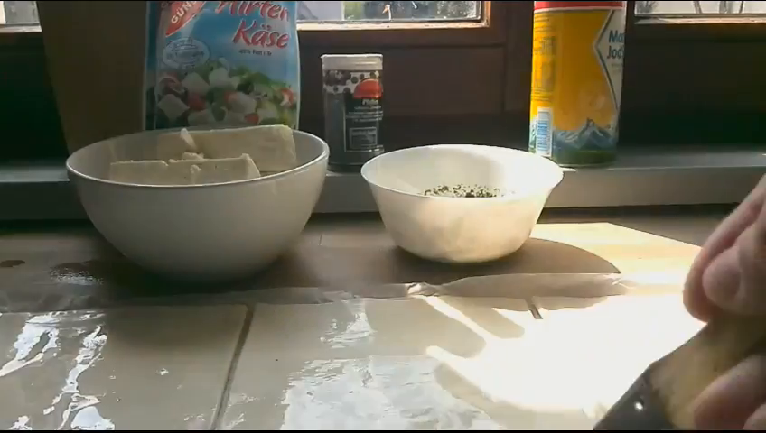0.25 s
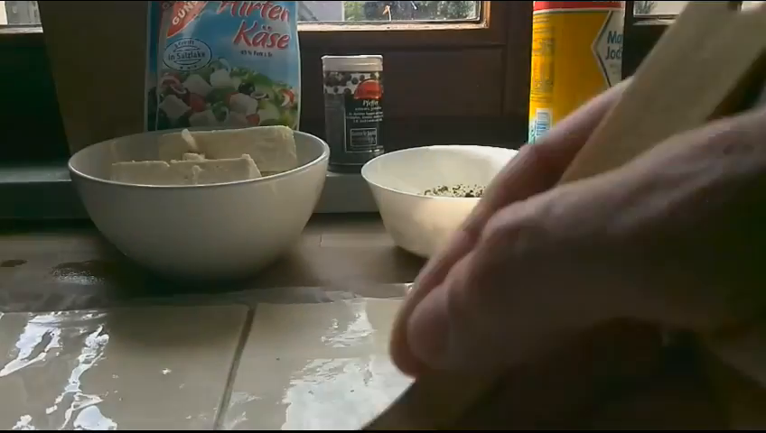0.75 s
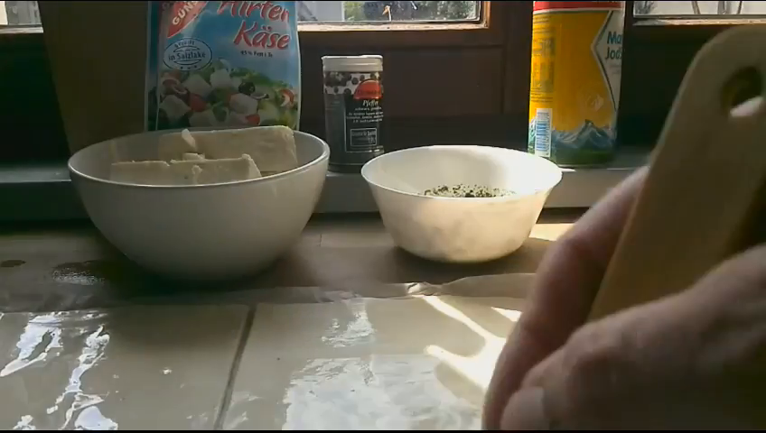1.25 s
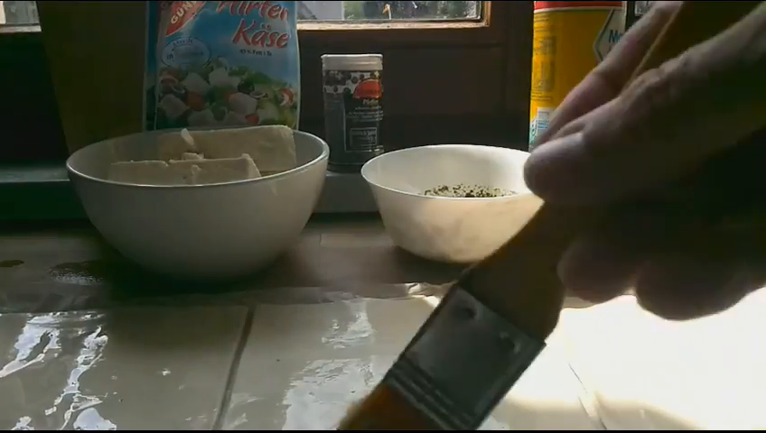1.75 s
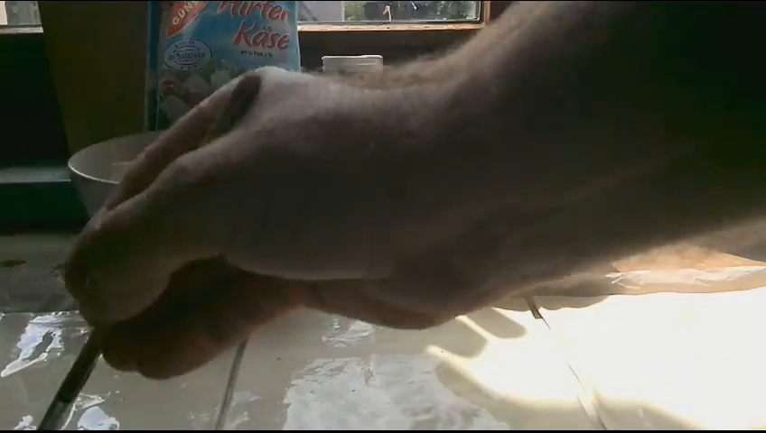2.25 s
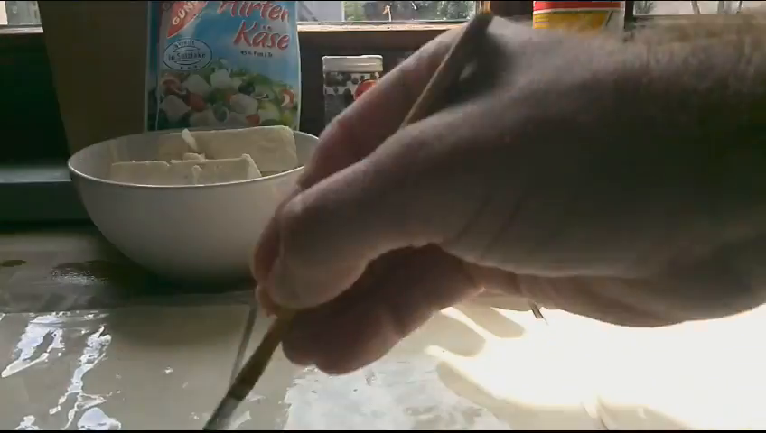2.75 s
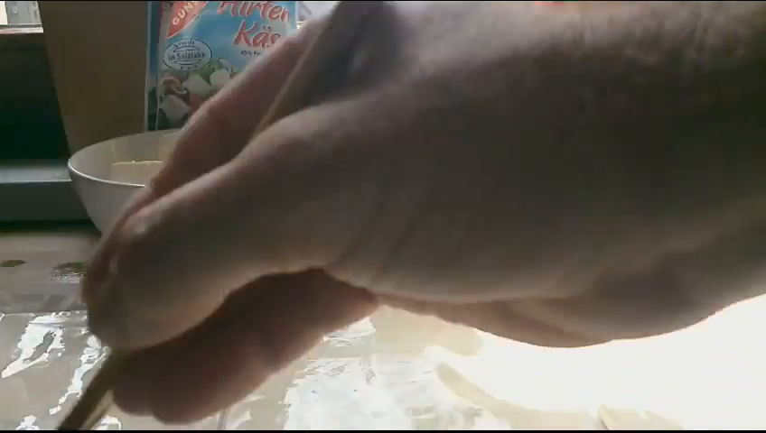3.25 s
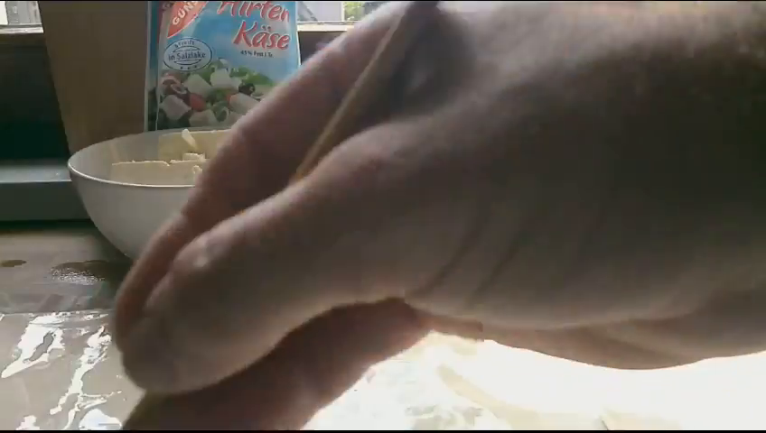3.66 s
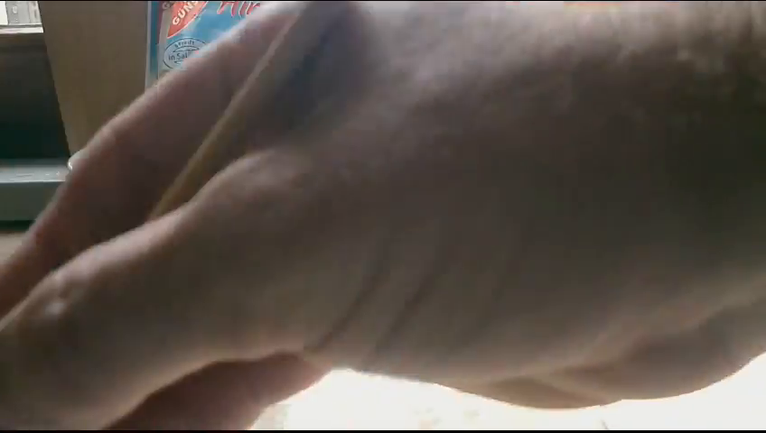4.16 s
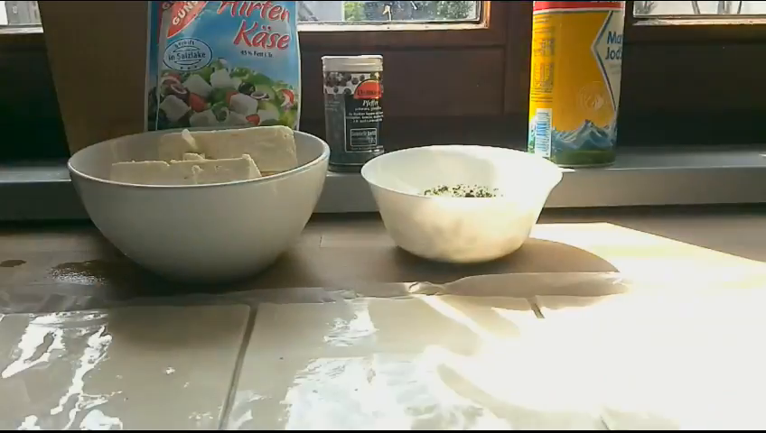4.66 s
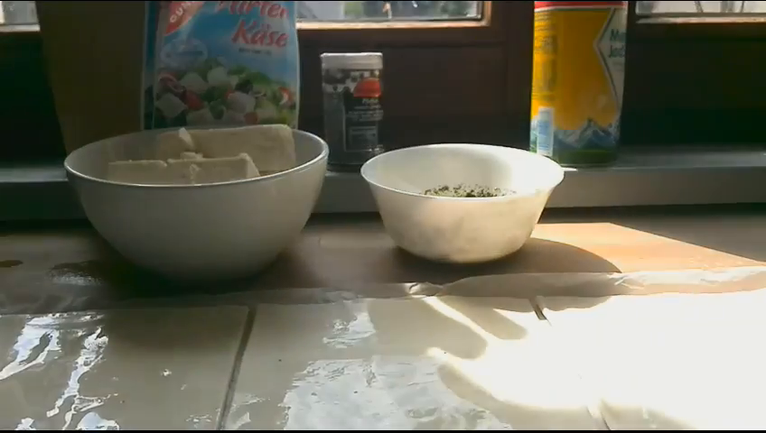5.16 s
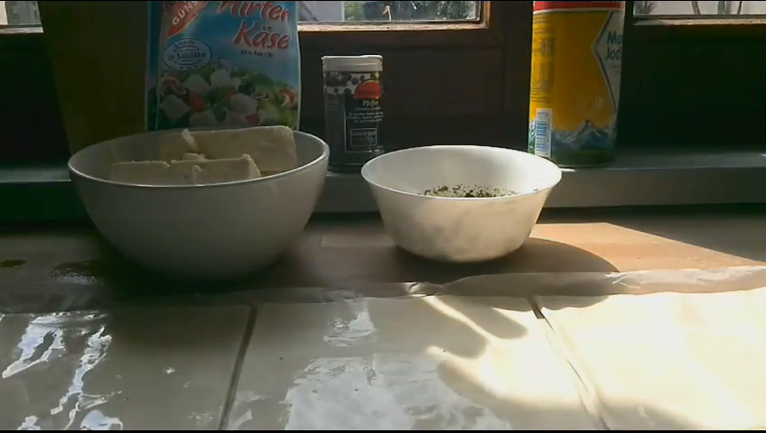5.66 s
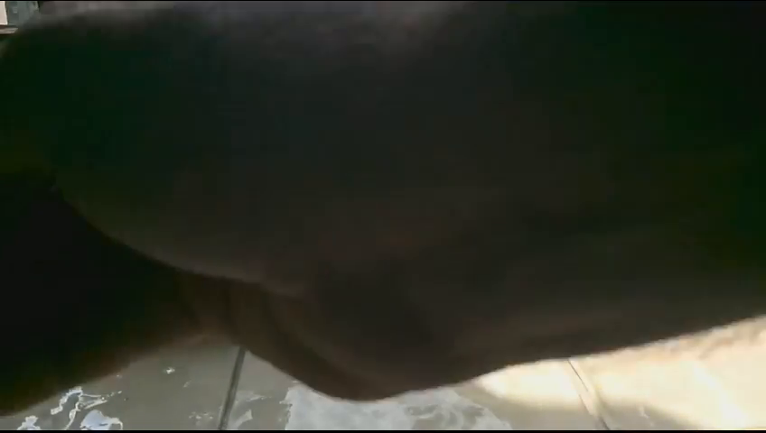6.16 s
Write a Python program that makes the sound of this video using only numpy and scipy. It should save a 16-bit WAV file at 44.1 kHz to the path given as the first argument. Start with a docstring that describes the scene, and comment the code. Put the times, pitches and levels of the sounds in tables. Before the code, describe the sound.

A small, quiet kitchen heard close to the counter: soft broadband hiss, slightly fuller at the start, and a low wavering mains hum that swells briefly around 0.4 s. A pastry brush makes short, whispery strokes on moist dough at about 0.3 and 0.7 s, then a distinctly stronger, brighter swish at 1.05 s. Lighter strokes follow irregularly at 1.7, 2.0, 2.4, 2.85, 3.3, 3.7 and 4.0 s, with tiny sticky ticks; the sharpest snaps at 3.68 s amid a little crackling cluster. A short dab comes at 4.6 s, and more ticks near 4.85 s. Extremely faint, high gliding whistles pass at 2.55-2.85 and 4.86-5.0 s. At 5.27 s the handle hits a glazed dish: one loud, hard, bright clack with a very brief ring and a short room echo. Faint dabs resume from 5.6 s, with small ticks until the end near 6.4 s.

```python
"""A kitchen counter, close to the microphone: a pastry brush sweeps quickly over moist dough sheets.
Friction makes the bristles slip and hiss (sparse random impulses shaped by pressure and spectrum);
the sticky surface ticks as it lets go (short bursts exciting a resonance), and once the handle taps a
glazed dish (decaying modes). Behind lie soft broadband noise, a wavering mains hum of narrow-band noise,
a thin high whistle of gliding sines heard twice, and the dense echoes of the kitchen."""
import sys
import numpy as np
from scipy import signal
from scipy.io import wavfile

SR = 44100
rng = np.random.default_rng(int(sys.argv[2]) if len(sys.argv) > 2 else 0)


def generate_wav(sig):
    """Save sig (samples, or channels by samples) to the path in sys.argv[1] as 16-bit PCM at SR."""
    pcm = np.round(np.clip(np.atleast_2d(sig).T, -1, 1) * 32767).astype(np.int16)
    wavfile.write(sys.argv[1], SR, pcm)


N = 282240

# Spectral density of the quiet kitchen, relative: [f/Hz, level per hertz/dB]
FLOOR_SPECTRUM = [(12, -34), (20, 6), (48, -2.5), (106, 2), (319, -1), (582, -5), (855, -6.5), (954, -5),
                  (1090, -9), (1440, -10), (3560, -15), (7450, -15), (10900, -17.5), (14000, -17)]
# Upper lines of the mains hum: [f/Hz, bandwidth/Hz, rms level/dB]
HUM_LINES = [(100.2, 3.2, -73), (206.3, 4.4, -79.5)]
# Side level by band, for strokes and floor: widest near 2 kHz, almost mono in the treble:
# [f/Hz, side level re mid/dB]
SIDE_LEVELS = [(60, -22), (150, -30.5), (380, -18), (940, -14), (2350, -8), (5870, -36), (14700, -51)]
# Pitch course of the high whistle, one list per glide: [t/s, f/Hz]
WHISTLE_GLIDES = [
    [(2.55, 13050), (2.635, 13800), (2.69, 13200), (2.744, 12300), (2.79, 12250), (2.84, 13300)],
    [(4.86, 10700), (4.895, 11050), (4.96, 10400), (5.02, 10400)],
]
# Typical level of each glide, about which it wavers: [level/dB]
GLIDE_LEVELS = [-75, -77]
# Modes of the glazed dish: [f/Hz, relative level/dB, t60/s]
DISH_MODES = [(1305, -13.5, 0.0081), (2260, -12, 0.02), (2465, -15, 0.038), (3620, -15, 0.016),
              (5010, -6.5, 0.012), (5010, 3, 0.019), (5720, -6, 0.0055), (7000, -33, .012),
              (7600, -14, .02), (8620, -4.5, 0.031), (8940, -6, 0.013), (10320, -24, 0.055),
              (12256, -31, 0.035), (13300, -20, .016)]
# Sticky releases of the dough: [t/s, peak level/dB, f/Hz, t60/s, height of broad snap re ring]
STICKY_TICKS = [(0.609, -40, 8450, 0.0046, 1.4), (0.798, -40.5, 8100, 0.007, 0.5),
                (1.174, -36, 8730, 0.0046, 0.8), (2.048, -44, 3480, 0.0032, 1.4),
                (2.465, -41, 3500, .005, 1.2), (2.752, -44, 2670, 0.0038, 0.8),
                (2.8392, -42, 8950, 0.0065, 0.5), (2.887, -37, 4040, 0.004, 1),
                (3.6402, -46, 2600, 0.004, 1.7), (3.6796, -25.5, 7400, 0.0041, 2.1),
                (3.7055, -34.5, 7100, 0.004, 0.5), (3.711, -47, 7950, 0.005, 0.7),
                (3.7356, -36, 8500, 0.005, 0.7), (3.7383, -39, 2400, .004, 1.1),
                (3.7423, -41.5, 1470, 0.0036, 1.2), (3.747, -41, 2400, 0.0029, 1.2),
                (3.7784, -46, 1900, 0.0026, 0.7), (3.8202, -49, 2080, 0.0042, 0.6),
                (4.012, -35.5, 7240, 0.0045, 0.8), (4.0385, -45, 8000, .005, .8),
                (4.0784, -40, 9370, 0.0045, 0.7), (4.181, -42, 2420, 0.0048, 0.5),
                (4.6684, -47, 9500, 0.005, 0.7), (4.8216, -41.5, 3400, 0.019, 0.27),
                (4.8327, -32.5, 11740, 0.0075, 0.28), (4.846, -32.5, 7000, 0.011, 0.31),
                (4.852, -43, 6730, 0.0085, 0.5), (4.8945, -44, 9000, 0.005, 0.7),
                (5.8003, -46, 8500, 0.0086, 0.7), (6.127, -39, 8200, 0.0042, 0.77),
                (6.3799, -35.5, 7800, 0.011, 0.4), (6.3954, -40.5, 5870, 0.024, 0.1)]
# Strokes and dabs: [t of full pressure/s, hold/s, rise/s, fall/s, hiss level/dB,
#                    level change over the hold/dB, drag level/dB, bright level re hiss/dB]
BRUSH_STROKES = [(.05, 0.054, 0.071, 0.17, -65, -2.5, -62, 1),
                 (.265, 0.053, .09, 0.1, -52.5, 2.5, -60.5, 3),
                 (0.684, 0.033, .11, .12, -52.5, 0.5, -60, 5),
                 (1.046, 0.057, 0.058, 0.073, -39.5, -0.5, -51, 6.5),
                 (1.44, .005, 0.11, 0.058, -61, -0.2, -68.5, 1.1),
                 (1.5, 0.078, .05, .08, -68.5, 2.5, -74, -3),
                 (1.665, 0.029, .07, 0.045, -56, 2.5, -64.5, 7),
                 (1.955, 0.089, 0.085, 0.085, -57.5, 5.5, -65.5, 1.1),
                 (2.405, 0.061, .12, 0.047, -52.5, 0.8, -60.5, 0.1),
                 (2.56, 0.1, 0.13, .1, -73.5, 1, -70.5, 6), (2.85, 0.044, 0.13, 0.097, -55.5, 6, -64, 6),
                 (3.04, 0.024, 0.023, 0.066, -65.5, -1.5, -61.5, -1.1),
                 (3.265, 0.048, 0.11, 0.12, -55, 2, -62, 6), (3.7, 0.04, 0.11, 0.11, -55.5, 1.5, -61.5, 5),
                 (4.04, 0.059, .08, 0.093, -51, -0.5, -56.5, 7),
                 (4.25, .005, 0.14, 0.13, -68.5, -0.5, -72, 1.1),
                 (4.5, .005, 0.037, 0.12, -68.5, -1, -69.5, -1),
                 (4.612, .004, 0.039, 0.036, -49, -0.2, -59.5, -4),
                 (4.86, 0.11, 0.052, .1, -67, 0.1, -68, 1.1),
                 (5.045, .01, 0.074, 0.11, -66.5, 0.5, -63.5, -3),
                 (5.155, .005, 0.08, 0.12, -63.5, -1, -67, -3),
                 (5.635, .005, .06, 0.059, -65.5, -3, -85, -2.1),
                 (5.795, .005, 0.039, 0.043, -58, -1.5, -69, -1.1),
                 (5.875, 0.0046, 0.067, 0.039, -59.5, -0.5, -66, 8),
                 (6.05, .05, .06, .1, -66.5, -1, -65, 1.1), (6.15, 0.036, 0.086, 0.075, -60, 1.8, -65.5, 6)]
# Spectral density of the bristle slips, relative: [f/Hz, level per hertz/dB]
BRISTLE_SPECTRUM = [(410, -49), (700, -12.5), (1730, -11), (2580, -6), (3150, -7), (4000, -7), (5200, -6.5),
                    (7580, 6), (9730, 2.5), (14000, -14)]

# Floor: it starts fuller and settles
FLOOR_DB, FLOOR_NARROWER_DB, OPENING_DB, OPENING_FADE_S = -62.5, -14.5, 3.5, 0.23
# Lowest hum line: it wanders and swells once
RUMBLE_HZ, RUMBLE_WIDTH_HZ, RUMBLE_DB, RUMBLE_WANDERS_DB = 49.4, 4.8, -71.5, 0.5
SWELL_S, SWELL_LENGTH_S, SWELL_DB = 0.42, 0.19, 9
# During the first glide a second line runs this far below
LOWER_LINE_HZ, LOWER_LINE_DB = 2980, -78
KITCHEN_T60_S, WALL_CUT_HZ, ECHO_DB, SIDEWAYS_DB = .36, 5500, -11, -30.5
TAP_S, TAP_DB, TAP_BASS_CUT_HZ = 5.2727, -14.5, 280
CRACK_DB, CRACK_T60_S = -15.5, 0.017
THUD_HZ, THUD_DB, THUD_T60_S = 554, -41, .008   # the counter under the dish
HIT_SKEW_DB = -20
EDGE_DB, EDGE_CURVE = 22, 1.5   # level lost over one rise or fall time; rounding of the shoulders
SLACK_DB_PER_S = 31             # bristles fold over mid-stroke: the longer the hold, the deeper the dip
DRAG_GROWS_DB, BRIGHT_FADES_DB = 1, 1   # dough loads the brush along a stroke
DULL_GROWS_DB = 3               # the hiss sinks in pitch as the brush slows
DRAG_BELOW_HZ, DULL_BELOW_HZ, BRIGHT_ABOVE_HZ = 5000, 7000, 10500
SLIPS_PER_S = 9000
CUTOFF_HZ = 13950


def from_db(db):
    """Logarithmic level: 20 dB is a factor of ten in amplitude."""
    return 10 ** (np.asarray(db) / 20)


def rms_one(x):
    """Normalisation of signal power: scale to rms 1."""
    return x / np.sqrt(np.mean(x ** 2) + 1e-20)


def at_hz(points, hz):
    """Interpolation of a spectrum on a logarithmic frequency axis."""
    table_hz, table_db = np.array(points).T
    return np.interp(np.log(hz), np.log(table_hz), table_db)


def drift(rate_hz):
    """Slow random fluctuation of rms 1: noise through a double one-pole low-pass."""
    step, warm_up = 40, 2000   # computed at every 40th sample, after the filter has settled
    r = np.exp(-2 * np.pi * rate_hz * step / SR)
    noise = rng.standard_normal(N // step + warm_up + 2)
    slow = signal.lfilter([1], [1, -2 * r, r * r], noise)[warm_up:]
    return np.interp(np.arange(N) / step, np.arange(len(slow)), rms_one(slow))


def ring(x, hz, t60):
    """Damped resonance: a unit click starts a decaying sine of height 1."""
    r = from_db(-60 / (t60 * SR))
    w = 2 * np.pi * hz / SR
    not_quite_silent = x + 1e-18   # keeps the arithmetic fast in silence
    return signal.lfilter([0, np.sin(w)], [1, -2 * r * np.cos(w), r * r], not_quite_silent)


def bands(sources, low_hz, steps, narrower_db=0):
    """Third-octave analysis, neighbours cut from different sources: (centre Hz, left and right)."""
    edges = low_hz * 2 ** (np.arange(steps + 1) / 3)
    for k, (low, high) in enumerate(zip(edges, edges[1:])):
        band_pass = signal.butter(2, [low, high], "band", fs=SR, output="sos")
        mid, side = signal.sosfilt(band_pass, sources[k % 2])
        hz = np.sqrt(low * high)
        side_gain = from_db(at_hz(SIDE_LEVELS, hz) + narrower_db)
        yield hz, mid + side_gain * side * [[1], [-1]]


def room_tone():
    """Stationary broadband noise, nearly equal on both sides, plus hum as noise in narrow resonances."""
    now = np.arange(N) / SR
    white = rng.standard_normal((2, 2, N))
    floor = 0
    for hz, band in bands(white, 22, steps=28, narrower_db=FLOOR_NARROWER_DB):
        floor = floor + from_db(at_hz(FLOOR_SPECTRUM, hz)) * band
    floor_db = FLOOR_DB + OPENING_DB * np.exp(-now / OPENING_FADE_S)

    swell = np.exp(-((now - SWELL_S) / SWELL_LENGTH_S) ** 2)
    rumble_db = RUMBLE_DB + SWELL_DB * swell + RUMBLE_WANDERS_DB * drift(1.3)
    hum = 0
    for hz, width_hz, db in [(RUMBLE_HZ, RUMBLE_WIDTH_HZ, rumble_db)] + HUM_LINES:
        t60 = np.log(1000) / (np.pi * width_hz)   # narrow lines ring long
        hum = hum + from_db(db) * rms_one(ring(rng.standard_normal(N), hz, t60))
    return from_db(floor_db) * rms_one(floor) + hum


def whistle():
    """Frequency modulation: slightly unsteady gliding sines, the integral of pitch giving the phase."""
    out, now = np.zeros(N), np.arange(N) / SR
    lower_line = np.subtract(WHISTLE_GLIDES[0], [0, LOWER_LINE_HZ])
    for glide, db in zip(WHISTLE_GLIDES + [lower_line], GLIDE_LEVELS + [LOWER_LINE_DB]):
        s, hz = np.transpose(glide)
        fade = np.clip(np.minimum(now - s[0], s[-1] - now) / .03, 0, 1)
        pitch = np.interp(now, s, hz) * (1 + .003 * drift(60))
        gain = np.sqrt(2) * from_db(db + 2.8 * drift(15))
        out += fade * gain * np.sin(2 * np.pi * np.cumsum(pitch) / SR)
    return out


def kitchen(x):
    """Reverberation: dense echoes build up in a few ms and decay, treble first; common and sideways tails."""
    s = np.arange(SR // 2) / SR
    noise = rng.standard_normal((2, len(s)))
    dull = signal.sosfilt(signal.butter(2, WALL_CUT_HZ, fs=SR, output="sos"), noise)
    treble = (noise - dull) * np.exp(-s / 0.068)
    build_up = np.minimum(s / 0.0036, 1)
    echoes = (dull + treble) * from_db(-60 * s / KITCHEN_T60_S) * build_up
    echoes = echoes / np.linalg.norm(echoes[0])
    mid, side = signal.fftconvolve(x[None], echoes, axes=1)[:, :N]
    return mid + from_db(SIDEWAYS_DB) * side * [[1], [-1]]


def tap():
    """Modal impact: the handle's knock cracks roughly and rings each dish mode, neighbours in opposite sense."""
    at, blow, rattle = round(TAP_S * SR), np.zeros(N), np.zeros(N)
    blow[at] = 1
    after_s = np.arange(N - at) / SR
    rattle[at:] = rng.standard_normal(N - at) * from_db(-60 * after_s / CRACK_T60_S)
    crack = signal.sosfilt(signal.butter(3, [3000, 9000], "band", fs=SR, output="sos"), rattle)
    modes = np.zeros(N)
    for k, (hz, db, t60) in enumerate(DISH_MODES):
        modes += (-1) ** k * from_db(db) * ring(blow, hz, t60)
    dish = from_db(TAP_DB) * modes + from_db(CRACK_DB) * crack
    bass_cut = signal.butter(1, TAP_BASS_CUT_HZ, "high", fs=SR, output="sos")
    thud = from_db(THUD_DB) * ring(blow, THUD_HZ, THUD_T60_S)
    return signal.sosfilt(bass_cut, dish) + thud


def ticks():
    """Adhesive release: a click of a few grains gives a broad snap and a short ring at its own pitch."""
    out, length = np.zeros(N), 2000
    grains = rng.standard_normal((len(STICKY_TICKS), 40)) * np.exp(-np.arange(40) / 7)
    snap_band = signal.butter(2, [1100, 15000], "band", fs=SR, output="sos")
    for (s, db, hz, t60, snap_share), burst in zip(STICKY_TICKS, grains):
        push = np.zeros(length)
        push[:40] = burst
        tone = ring(push, hz, t60)
        sound = tone / np.abs(tone).max() + snap_share * signal.sosfilt(snap_band, push)
        at = round(s * SR)
        out[at:at + length] += from_db(db) * sound[:N - at] / np.abs(sound).max()
    return out


def pressure():
    """Contact force sets level: strokes rise, hold with a dip and fall; gains of hiss, dull, drag, bright."""
    columns = np.array(BRUSH_STROKES).T[:, :, None]
    start, held, rise, fall, hiss_db, change_db, drag_db, bright_db = columns
    s = np.arange(0, N / SR + .002, .002)
    along = np.clip((s - start) / held, 0, 1)
    outside = np.maximum(start - s, 0) / rise + np.maximum(s - start - held, 0) / fall
    dip_db = SLACK_DB_PER_S * held * np.sin(np.pi * along) ** 2
    shape_db = change_db * along - dip_db - EDGE_DB * outside ** EDGE_CURVE
    # from -1 at the beginning of the rise to 1 at the end of the fall
    course = np.clip(2 * (s - start + rise) / (rise + held + fall) - 1, -1, 1)
    levels_db = [hiss_db,
                 hiss_db + DULL_GROWS_DB * course,
                 drag_db + DRAG_GROWS_DB * course,
                 hiss_db + bright_db - BRIGHT_FADES_DB * course]
    gains = []
    for db in levels_db:
        gain = np.linalg.norm(from_db(db + shape_db), axis=0)   # strokes add in power
        gains.append(np.interp(np.arange(N) / SR, s, gain))
    return gains


def brush():
    """Stick-slip friction: thousands of uneven bristle slips a second; pressure, drag and speed colour them."""
    hiss_gain, dull_gain, drag_gain, bright_gain = pressure()
    slips = rng.random((2, 2, N)) < SLIPS_PER_S / SR
    sizes = rng.standard_normal((2, 2, N))
    spread = np.minimum(rng.exponential(1, (2, 2, N)), 4)
    sizes = sizes * from_db(1.18 * spread)
    judder_db = 1.34 * drift(80)         # tufts catch and let go together
    drag, dull, hiss, bright = 0, 0, 0, 0
    for hz, band in bands(slips * sizes, 700, steps=13):
        band = from_db(at_hz(BRISTLE_SPECTRUM, hz) + judder_db + 2.2 * drift(25)) * band
        if hz < DRAG_BELOW_HZ:
            drag = drag + band
        elif hz < DULL_BELOW_HZ:
            dull = dull + band
        elif hz > BRIGHT_ABOVE_HZ:
            bright = bright + band
        else:
            hiss = hiss + band
    hissing = hiss_gain * hiss + dull_gain * dull + bright_gain * bright
    return hissing / (hiss + dull).std() + drag_gain * rms_one(drag)


def scene():
    """Superposition: brush, ticks and tap near the microphone, their echoes, the whistle and the floor."""
    strokes = brush()
    hits = ticks() + tap()
    # adding the slope shifts the hits in time: they reach one side a moment sooner
    skewed = hits + from_db(HIT_SKEW_DB) * np.gradient(hits) * [[1], [-1]]
    echoes = from_db(ECHO_DB) * kitchen(hits + strokes.mean(0))
    return strokes + skewed + echoes + whistle() + room_tone()


def record(dry):
    """Band limitation: a steep elliptic low-pass cuts the top."""
    return signal.sosfilt(signal.ellip(12, .2, 70, CUTOFF_HZ, fs=SR, output="sos"), dry)


dry = scene()
out = record(dry)
generate_wav(out)
```